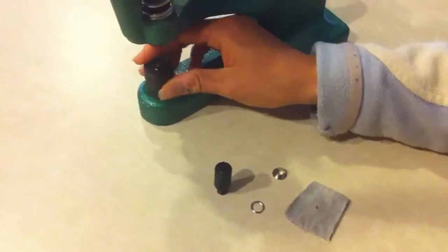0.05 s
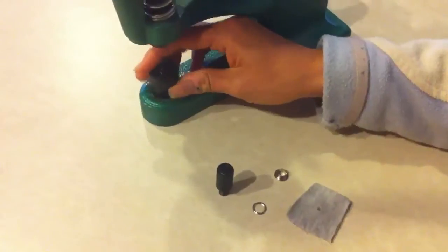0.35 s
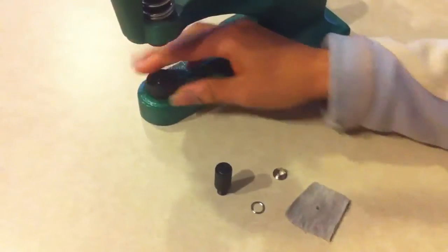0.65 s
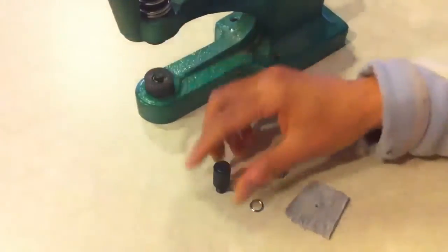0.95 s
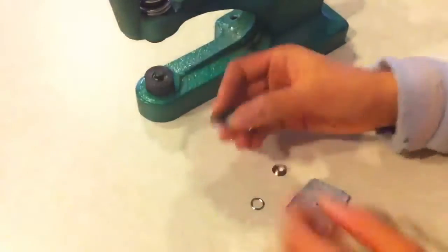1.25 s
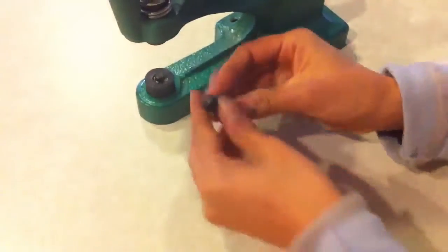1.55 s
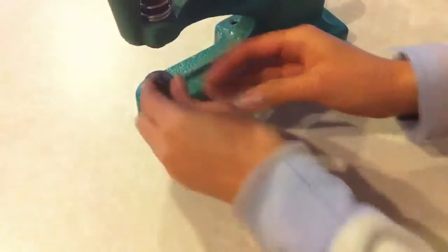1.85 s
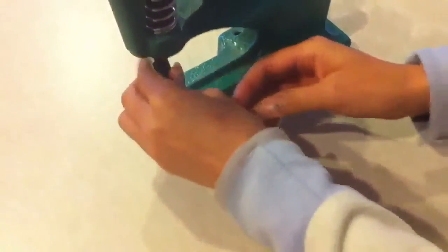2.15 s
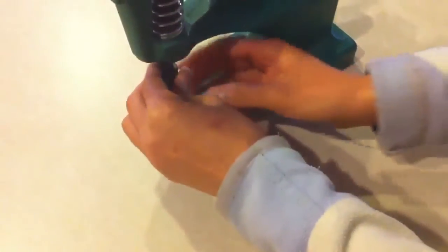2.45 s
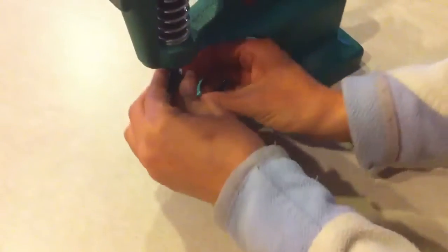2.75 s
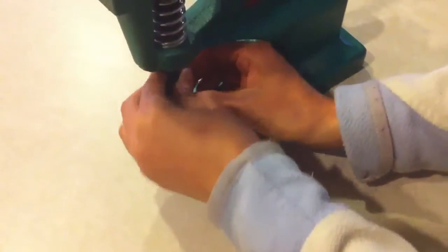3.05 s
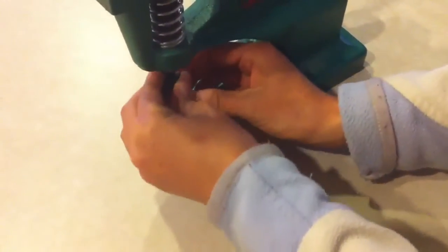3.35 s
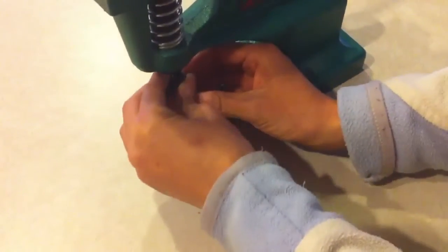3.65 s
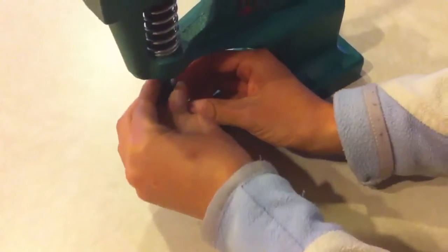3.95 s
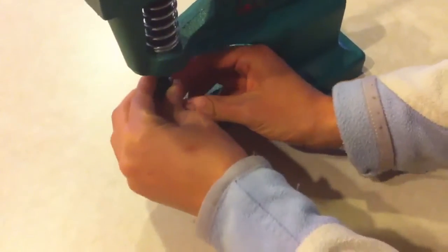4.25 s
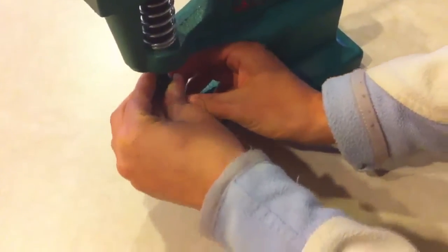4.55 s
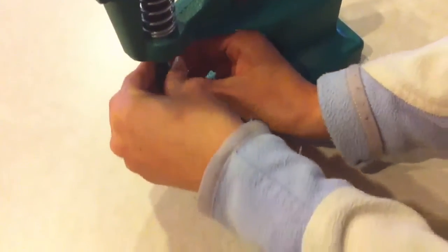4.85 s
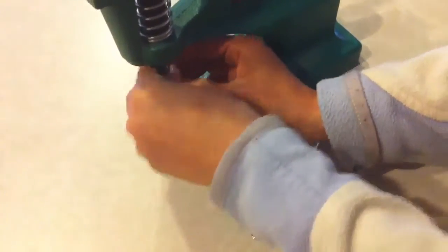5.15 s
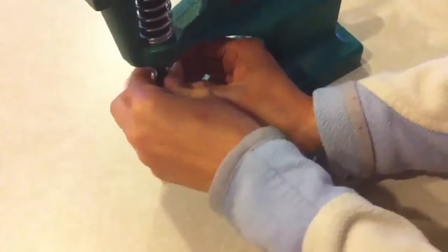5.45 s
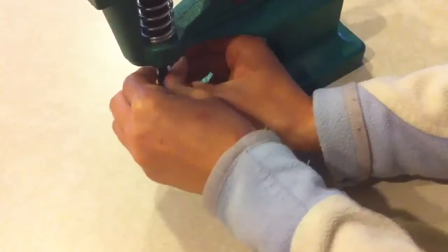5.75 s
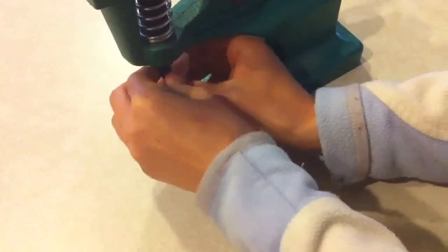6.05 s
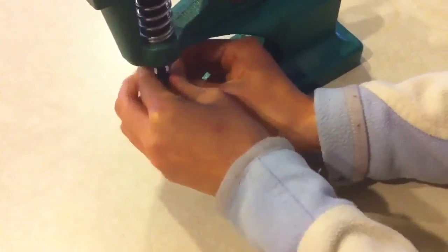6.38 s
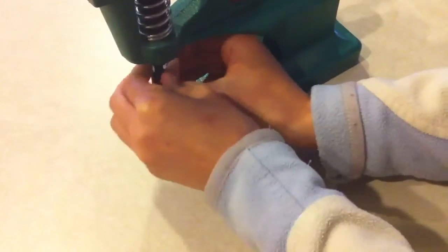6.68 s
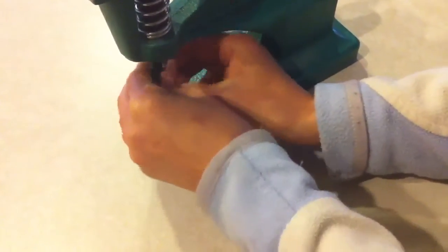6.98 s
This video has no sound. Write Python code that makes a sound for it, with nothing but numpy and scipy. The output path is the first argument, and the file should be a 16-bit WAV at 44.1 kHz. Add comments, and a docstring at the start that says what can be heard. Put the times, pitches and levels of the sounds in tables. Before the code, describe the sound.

One sharp metal clank as a part seats in a table-top press, then quiet clicking, knocking and rubbing of steel being fitted.

```python
"""Fitting steel dies into a press

A cast-iron press on a table in a small room, the microphone close by. The lower die is twisted by hand
in its seat, clicks, and drops home with a loud clank. The upper die is picked up and worked into the ram
with small scrapes and clicks, which sound through the frame and the table top."""
import sys
import numpy as np
from scipy import signal
from scipy.fft import rfft, irfft
from scipy.io import wavfile

SR = 44100
rng = np.random.default_rng(int(sys.argv[2]) if len(sys.argv) > 2 else 0)


def file_out(sig):
    """Save sig as 16-bit WAV at sys.argv[1]."""
    # one column per channel
    cols = np.atleast_2d(sig).T
    # limit, then scale
    lim = np.clip(cols, -1, 1)
    pcm = np.round(lim * 32767).astype(np.int16)
    wavfile.write(sys.argv[1], SR, pcm)


N = 309582
RING_T = np.arange(SR // 2) / SR  # time axis of one blow

# the lower die strikes its seat, too softly to excite the steel above a cutoff: start_s, gain_db, cutoff_hz
CLANKS = [(0.4923, -25, 6000), (0.749, 1.5, 14970)]
# modes of the table top, the cast frame and the steel dies: pitch_hz, relative_db, t60_s
TABLE_MODES = [(122, -18.5, 0.037), (165, -9, 0.047), (205, -8, 0.033), (290, 0, 0.046), (328, -1.5, 0.026),
               (450, 1.5, .03), (510, 2, 0.0097)]
FRAME_MODES = [(699, -7.5, 0.045), (879.7, -2.5, 0.012), (1024, -0.5, 0.015), (1156, -3.5, 0.019),
               (1212, -3.5, 0.018), (1780, -8, .012), (1923, -6, 0.027), (2140, -4.5, 0.011)]
DIE_MODES = [(2700, -7, .014), (3231, -13, 0.021), (3593, -3.5, 0.043), (4023, -4, 0.017),
             (4440, -2, 0.031), (4770, 1, .025), (5560, -7.5, 0.033), (6240, -4, 0.016), (6860, -9, 0.041),
             (9300, -14.5, 0.049), (9900, -12.5, .03), (12480, -15.5, 0.046)]


def amp(db):
    """Decibels to gain."""
    return 10 ** (np.asarray(db) / 20)


def unit(x):
    """Scales to rms 1."""
    return x / np.sqrt(np.mean(x ** 2) + 1e-20)


def unit_attack(x):
    """Scales a blow to rms 1 over its first 20 ms."""
    return x / np.sqrt(np.mean(x[:SR // 50] ** 2) + 1e-20)


def read(points, hz):
    """Reads a table on a log-frequency axis."""
    f, value = np.transpose(points)
    return np.interp(np.log(hz + 1), np.log(f + 1), value)


def add(mix, start_s, sound):
    """Mixes a sound in at start_s."""
    part = mix[max(round(start_s * SR), 0):][:len(sound)]
    part += sound[:len(part)]


def colour(x, spectrum):
    """Minimum-phase filter through points of frequency_hz, gain_db."""
    log_gain = np.log(amp(read(spectrum, abs(np.fft.fftfreq(4096, 1 / SR)))))
    taps = np.fft.ifft(np.exp(np.conj(signal.hilbert(log_gain)))).real
    return signal.fftconvolve(x, taps[:len(taps) // 2])[:len(x)]


def ring(modes, tilt_db_per_octave=0, scatter_db=0):
    """Dying sines; with scatter, the point of contact changes the share and sign of each."""
    hz, db, t60 = np.transpose(modes)[:, :, None]
    share = amp(db + tilt_db_per_octave * np.log2(hz / hz[0]) + scatter_db * rng.standard_normal(hz.shape))
    sign = rng.choice([-1, 1], hz.shape) if scatter_db else (-1) ** np.arange(len(hz))[:, None]
    t = RING_T[:int(min(t60.max() * 2, .5) * SR)]
    partials = sign * share * np.exp(-np.log(1000) * t / t60) * np.sin(2 * np.pi * hz * t)
    return np.pad(partials.sum(0), (0, len(RING_T) - len(t)))


def burst(t60_s):
    """The brief chatter of two hard faces meeting."""
    return rng.standard_normal(len(RING_T)) * np.exp(-np.log(1000) * RING_T / t60_s)


def touch(start_s, level_db, freed_s=.485, usual_db=-58):
    """Tilt (dB per octave) and table thud (dB) of a contact; both are muted while the lower die binds."""
    tilt, thud_db = (-10, -66.5) if start_s < freed_s else (0, -60.5)
    force_db = level_db - usual_db
    return tilt - 0.46 * force_db, thud_db + 0.4733 * force_db  # firmer is duller and thuds more


def knock(frame_db, thud_db, tilt):
    """One blow knocks the frame and thuds through the table top."""
    frame = unit_attack(ring(FRAME_MODES, tilt, scatter_db=3))
    table = unit_attack(ring(TABLE_MODES, scatter_db=1.5))
    return amp(frame_db) * frame + amp(thud_db) * table


def room_tone(level_db=-65, drone_hz=335, drone_width_hz=14, drone_db=2):
    """Low room tone with a faint drone, under even microphone hiss."""
    # spectrum of the room tone and hiss: frequency_hz, relative_db
    spectrum = [(25, -15.5), (60, -21), (90, -15.5), (125, -5), (170, 1), (340, -5), (450, -7), (800, -7.5),
                (1500, -10), (3000, -12), (6000, -12.5), (10000, -15), (15500, -13)]
    hz = np.fft.rfftfreq(N, 1 / SR)
    drone = amp(drone_db) / (1 + (2 * (hz - drone_hz) / drone_width_hz) ** 2)
    shape = amp(read(spectrum, hz)) * (1 + drone)
    return amp(level_db) * unit(irfft(rfft(rng.standard_normal(N)) * shape, N))


def small_room(x, first_echo_s=0.0033, early_db=3, early_t60_s=0.052):
    """Dense reflections, strongest from the near surfaces, each band dying at its own speed."""
    # decay of the room: frequency_hz, t60_s
    decay_times = [(60, 0.16), (250, 0.46), (1000, 0.51), (3000, 0.56), (6000, 0.37), (11000, 0.38),
                   (16000, 0.18)]
    # colour of the reverberation: frequency_hz, gain_db
    tail_colour = [(40, -9), (150, 0.5), (500, 0), (1000, -2.5), (2000, -3), (4500, -2.5), (7000, -2.5),
                   (15000, -4.5)]
    t = np.arange(SR) / SR
    echoes = rng.standard_normal(SR) * (t > first_echo_s) * (1 + amp(early_db - 60 * t / early_t60_s))
    hz, when, bands = signal.stft(echoes, SR, nperseg=256)
    decay = amp(-60 * when / read(decay_times, hz)[:, None])
    bands = bands * decay * amp(read(tail_colour, hz))[:, None]
    tail = signal.istft(bands, SR, nperseg=256)[1] / np.linalg.norm(echoes * amp(-120 * t))
    return signal.fftconvolve(x, tail)[:N]


def finger_brush(rise_db_per_s=328, fall_db_per_s=300.5):
    """Skin sliding on steel: a soft, high hiss that swells and fades."""
    # fingers pass over the metal: peak_s, level_db
    strokes = [(1.31, -71), (1.808, -58)]
    spectrum = [(200, -12), (1500, 3), (3000, -7), (7000, -4), (12000, 7), (15500, 2.5)]
    hiss = unit(colour(rng.standard_normal(N), spectrum))
    t = np.arange(N) / SR
    swells = (amp(db - np.maximum(rise_db_per_s * (s - t), fall_db_per_s * (t - s))) for s, db in strokes)
    return hiss * sum(swells)


def table_bumps(frame_db=-11, tilt_db_per_octave=-2, rise_s=0.0023):
    """A soft hand thuds on the table top and barely stirs the frame."""
    # the hand meets the table: start_s, thud_db
    bumps = [(1.146, -50.5), (4.194, -65), (4.582, -53.5), (6.618, -67)]
    out = np.zeros(N)
    for start_s, thud_db in bumps:
        blow = knock(thud_db + frame_db, thud_db, tilt_db_per_octave)
        add(out, start_s, blow * (1 - np.exp(-RING_T / rise_s)))
    return out


def die_nudges(gain_db=-1.5, rise_s=0.0018, lead_s=0.0035, slide_db=-7, slide_t60_s=0.061):
    """The die grazes, seats and slides a little further, so the knock has no sharp edge."""
    # dull knocks, cushioned by the fingers: start_s, frame_db
    nudges = [(.134, -40.5), (.207, -45.5), (.476, -49), (.71, -44), (1.135, -53), (2.391, -57.5),
              (2.588, -58.5), (2.884, -60), (2.972, -60), (3.229, -58), (3.3274, -48), (3.476, -59),
              (3.524, -50.5), (3.871, -57), (4.347, -58.5), (5.064, -54), (5.635, -57.5), (5.678, -49.5),
              (5.917, -56), (6.455, -57), (6.815, -57.5), (6.94, -58)]
    out = np.zeros(N)
    for start_s, frame_db in nudges:
        tilt, thud_db = touch(start_s, frame_db)
        blow = knock(frame_db, thud_db, tilt) * (1 - np.exp(-RING_T / rise_s))
        slide = (burst(slide_t60_s) * (1 - np.exp(-RING_T / lead_s)))[:SR // 10]
        rub = signal.fftconvolve(slide / np.linalg.norm(slide), blow)
        add(out, start_s, amp(gain_db) * blow)
        add(out, start_s - lead_s, amp(gain_db + slide_db) * rub)
    return out


def friction(count, slips_per_s=900, spread_db=3):
    """The force of steel rubbing on steel: tiny uneven slips over faint noise, faded in and out."""
    slipping = rng.random(len(RING_T))[:count] < slips_per_s / SR
    size = np.minimum(rng.exponential(1, len(RING_T))[:count], 3)
    noise = 0.058 * rng.standard_normal(len(RING_T))[:count]
    force = (slipping * amp(spread_db * size) + noise) * signal.windows.tukey(count, .3)
    return force - force.mean()


def die_scrapes(table_db=-5, die_db=-19, grit_db=-13, judder_hz=735, judder_t60_s=0.024):
    """Slips drive frame, table and die; a tight fit judders at one pitch and passes less to the table."""
    # a die rubs as it is turned: start_s, length_s, frame_db, judder_relative_db
    scrapes = [(0, .12, -59.5, -4), (0.118, 0.067, -56.5, -1), (0.237, 0.013, -51.5, -7),
               (0.287, 0.12, -49, -3), (0.471, 0.024, -46.5, -15.5), (0.627, 0.052, -55, -8),
               (0.699, 0.027, -56, -15), (2.237, 0.16, -68, -1), (3.001, 0.081, -56, 5.5),
               (3.211, 0.053, -54, -4.5), (3.446, .1, -69.5, -2), (3.626, .068, -64.5, -1),
               (3.87, 0.074, -60.5, -4), (4.021, 0.066, -68, 2), (5.108, 0.084, -65.5, 2),
               (5.42, 0.13, -73, -3), (5.656, 0.067, -66.5, -6), (5.931, 0.062, -59, -4.5),
               (6.917, 0.048, -67, 4)]
    grit_spectrum = [(200, -9), (1000, 2.5), (2800, -6), (5000, -14.5), (12000, -31.5)]
    out = np.zeros(N)
    for start_s, length_s, frame_db, judder_db in scrapes:
        tilt, thud_db = touch(start_s, frame_db)
        slips = friction(int(length_s * SR))
        grit = colour(burst(0.0083), grit_spectrum)
        responses = [(frame_db, ring(FRAME_MODES, tilt, scatter_db=3.5)),
                     (thud_db + table_db - .5 * judder_db, ring(TABLE_MODES, scatter_db=2.5)),
                     (frame_db + die_db + tilt, ring(DIE_MODES, scatter_db=1)),
                     (frame_db + grit_db + tilt, grit),
                     (frame_db + judder_db, ring([(judder_hz, 0, judder_t60_s)]))]
        for level_db, response in responses:
            rub = signal.fftconvolve(slips, response)
            add(out, start_s, amp(level_db) * rub * np.sqrt(len(slips)) / np.linalg.norm(rub))
    return out


def die_clicks(gain_db=-1, chatter_db=-2, chatter_t60_s=.024, focus_db=9, focus_octaves=0.17,
               rise_s=0.0008, extra_thud_db=2):
    """Hard contacts also ring the die; the grip decides which of its modes stands out."""
    # steel clicks on steel: start_s, frame_db, die_db, frame_tilt_db_per_octave, focus_hz
    clicks = [(0.4924, -36.5, -39, 2.5, 3179), (2.236, -56, -61, 5, 3970), (3.013, -46, -59, -11, 4570),
              (4.3846, -51, -47, 1.5, 4610), (4.609, -43.5, -47, 6, 5840), (5.124, -49, -50.5, -0.5, 6200),
              (5.221, -54.5, -59, -3.5, 5130), (5.819, -52, -58.5, 5.5, 4430),
              (6.061, -46.5, -54, -4.5, 4260), (6.386, -56, -58, 7.5, 6100)]
    chatter_spectrum = [(300, -12), (2000, 2), (6300, -0.5), (8000, -12), (15000, -17)]
    out = np.zeros(N)
    for start_s, frame_db, die_db, tilt, focus_hz in clicks:
        _, thud_db = touch(start_s, frame_db)
        gripped = [(hz, db + focus_db * np.exp(-(np.log2(hz / focus_hz) / focus_octaves) ** 2), t60)
                   for hz, db, t60 in DIE_MODES]
        chatter = colour(burst(chatter_t60_s), chatter_spectrum)
        steel = unit_attack(ring(gripped, scatter_db=5)) + amp(chatter_db) * unit_attack(chatter)
        blow = knock(frame_db, thud_db + extra_thud_db, tilt) + amp(die_db) * unit_attack(steel)
        add(out, start_s, amp(gain_db) * blow * (1 - np.exp(-RING_T / rise_s)))
    return out


def after_ring():
    """The loud clank leaves two faint, long tones in the press."""
    # what keeps singing: pitch_hz, level_db, t60_s
    long_modes = [(339, -63, 2.9), (706, -57.5, 2)]
    out, t = np.zeros(N), np.arange(2 * SR) / SR
    tones = sum(amp(db - 60 * t / t60) * np.sin(2 * np.pi * hz * t) for hz, db, t60 in long_modes)
    add(out, CLANKS[-1][0], tones)
    return out


def die_clanks(crack_db=-7, crack_t60_s=0.016, rise_s=.0013):
    """The lower die hits its seat: a crack, a short heavy clack and thin lasting rings."""
    # modes of the seated die and the anvil: pitch_hz, relative_db, t60_s
    anvil_modes = [(714, -22.5, 0.071), (884.5, -15.5, 0.025), (1036, 2.5, .012), (1130, -22.5, .07),
                   (1880, -17.5, 0.042), (2114, -3, 0.0096), (2710, -11, 0.0091), (3208, -23.5, 0.02),
                   (3533, -20.5, 0.034), (3734, -39.5, 0.39), (4480, -3.5, 0.0063), (4848, -20.5, 0.02),
                   (5300, -36.5, 0.034), (5750, -21, 0.035), (5780, -38.5, 0.49), (6410, -18.5, 0.016),
                   (6874, -40, .27), (7186, -23.5, 0.0076), (9000, -25.5, 0.018), (9394, -44.5, .15),
                   (9820, -29.5, 0.077), (10750, -28.5, 0.2), (11420, -28.5, 0.13), (11830, -44, .2),
                   (12200, -34.5, .06), (12670, -24.5, 0.046)]
    # the hard crack of the contact: frequency_hz, gain_db
    crack_spectrum = [(25, 2), (60, -3), (150, 4), (300, -5.5), (600, -3.5), (1500, -5.5), (3000, 4),
                      (4600, 1), (7300, 0.5), (8200, -9), (12800, -6), (13500, -12), (15500, -15)]
    out = np.zeros(N)
    for start_s, gain_db, cutoff_hz in CLANKS:
        blow = ring(anvil_modes) + amp(crack_db) * colour(burst(crack_t60_s), crack_spectrum)
        blow *= 1 - np.exp(-(RING_T / rise_s) ** 2)  # the casting takes a moment to get moving
        softness = signal.butter(3, cutoff_hz, fs=SR, output="sos")
        add(out, start_s, amp(gain_db) * signal.sosfilt(softness, blow))
    return out


def scene(handling_reverb_db=1, low_cut_hz=125):
    """The press and the hands, close to one microphone, with the small room around them."""
    clanks = die_clanks()
    handling = die_clicks() + die_nudges() + die_scrapes() + table_bumps() + finger_brush()
    low_cut = signal.butter(3, low_cut_hz, "high", fs=SR, output="sos")
    handling = signal.sosfilt(low_cut, handling)  # the handling sounds thin out below 125 Hz
    reverb = small_room(clanks + amp(handling_reverb_db) * handling)
    return (clanks + after_ring() + handling + reverb + room_tone())[None]


def record(dry):
    """The recorder clips at full scale and cuts the treble above 15850 Hz."""
    band_limit = signal.firwin(511, 15850, window=("kaiser", 9), fs=SR)
    return signal.oaconvolve(np.clip(dry, -1, 1), band_limit[None], "same")


dry = scene()
out = record(dry)
file_out(out)
```